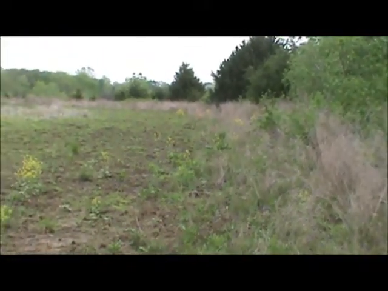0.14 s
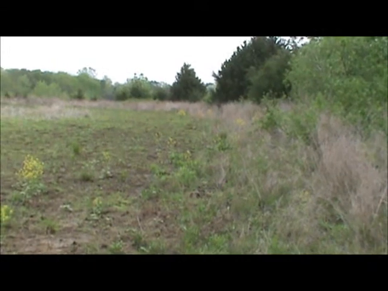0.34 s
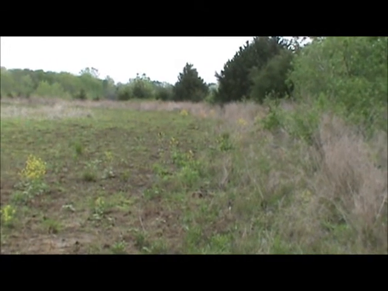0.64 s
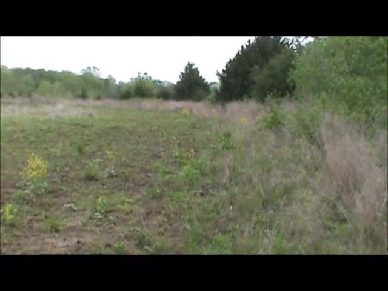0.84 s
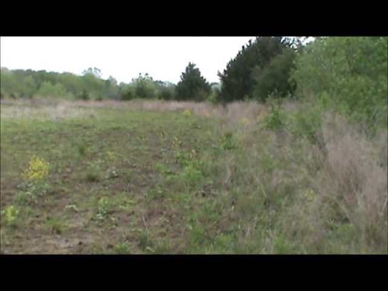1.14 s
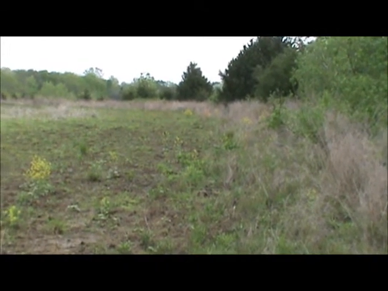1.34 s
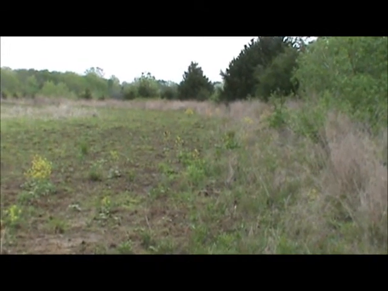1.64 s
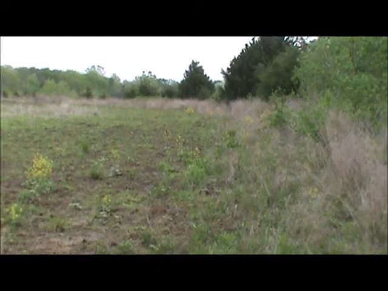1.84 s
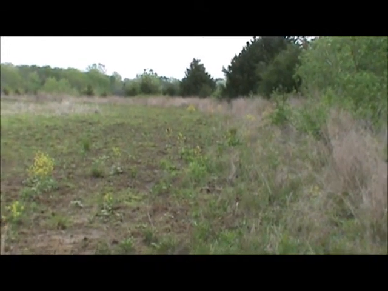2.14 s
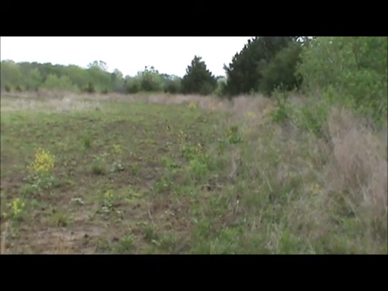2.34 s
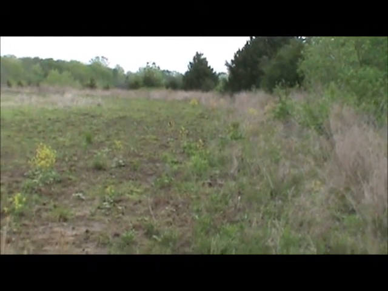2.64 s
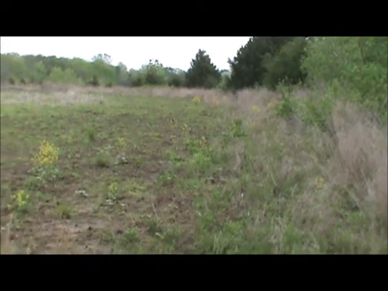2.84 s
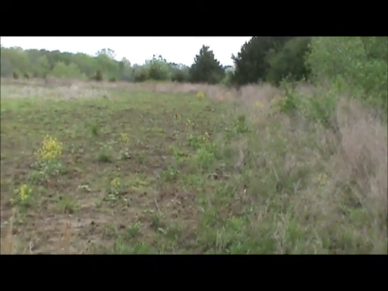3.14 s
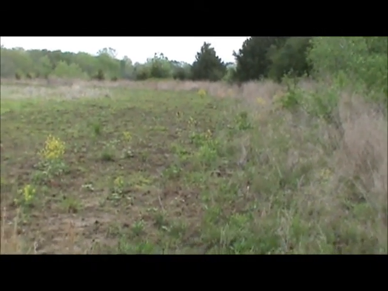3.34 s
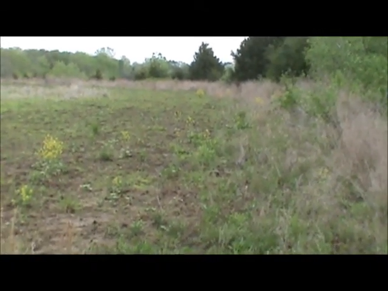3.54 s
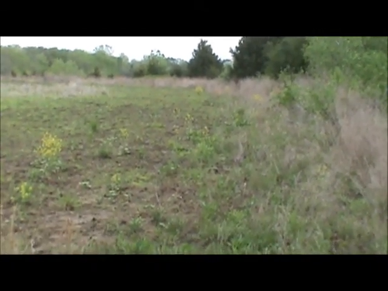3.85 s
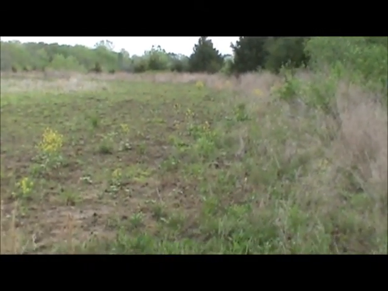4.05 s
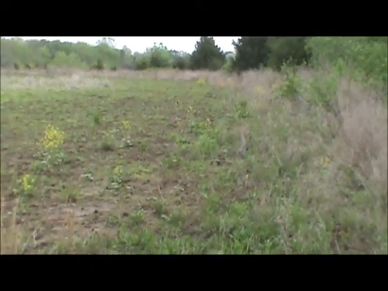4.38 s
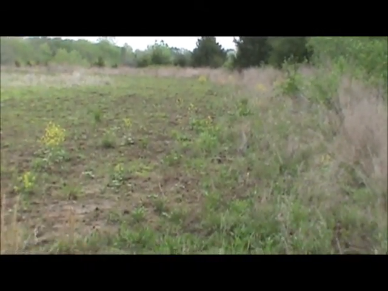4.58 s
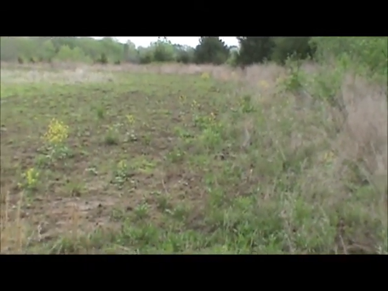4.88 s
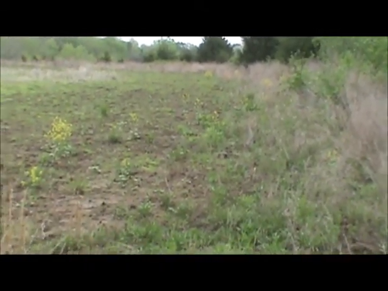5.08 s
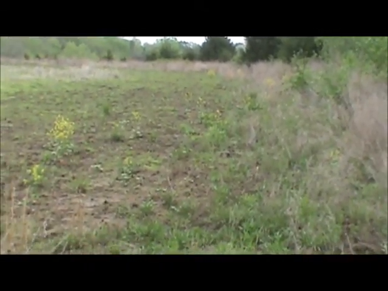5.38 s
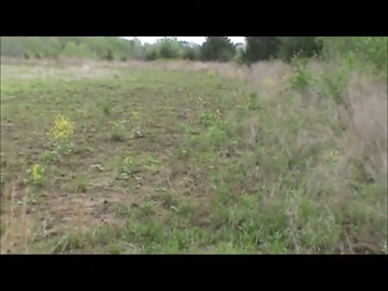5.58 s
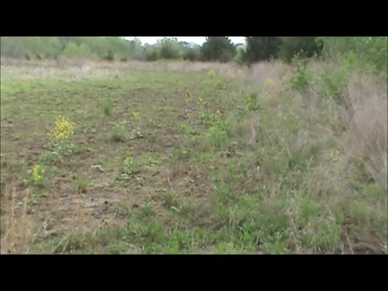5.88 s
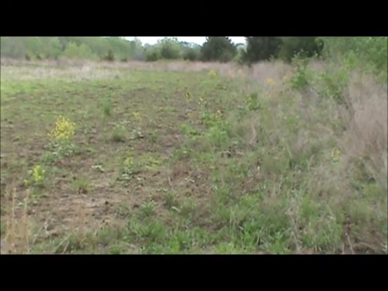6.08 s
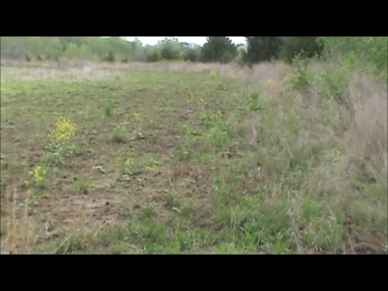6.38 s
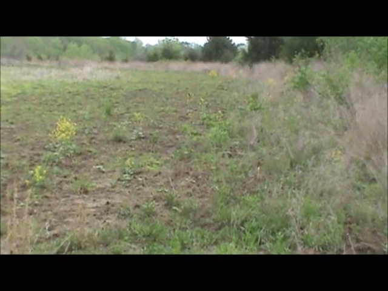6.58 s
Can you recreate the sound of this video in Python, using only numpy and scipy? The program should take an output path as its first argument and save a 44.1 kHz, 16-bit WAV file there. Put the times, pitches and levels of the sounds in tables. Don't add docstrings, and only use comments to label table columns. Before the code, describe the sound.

Squealing, raspy hound bays echo off a tree line under thumping wind and camera hiss, then a small bird whistles far off at left.

```python
import sys
import numpy as np
from scipy import signal
from scipy.fft import rfft, irfft, next_fast_len
from scipy.io import wavfile
from scipy.ndimage import uniform_filter1d, map_coordinates

SR = 44100
rng = np.random.default_rng(int(sys.argv[2]) if len(sys.argv) > 2 else 0)


def store_wav(level_fs):
    pcm = np.round(np.clip(np.atleast_2d(level_fs), -1, 1) * 32767)
    wavfile.write(sys.argv[1], SR, pcm.T.astype(np.int16))


def decibels_to_gain(level_db):
    exponent = np.asarray(level_db, float) / 20
    return 10 ** exponent


N = 296352
TIME = np.arange(N) / SR
CLOCK = np.arange(0, 7, .001)


def unit(x):
    return x / np.sqrt(np.mean(x ** 2) + 1e-20)


def along(points, hz):
    f, value = np.transpose(points)
    return np.interp(np.log(hz + 1), np.log(f + 1), value)


def curves(rows):
    s, *columns = np.transpose(rows)
    return [np.interp(TIME, s, column) for column in columns]


def played(tables, fade):
    inside = sum((TIME >= rows[0][0]) & (TIME < rows[-1][0]) for rows in tables) > 0
    gate = uniform_filter1d(inside * 1., int(fade * SR))
    return curves(sorted(row for rows in tables for row in rows)), gate


def wobble(rate):
    knots = rng.standard_normal(int(N * rate / SR) + 4)
    return map_coordinates(knots, [np.arange(N) * rate / SR])


def filtered(x, response):
    size = next_fast_len(N + SR // 2)
    return irfft(rfft(x, size) * response(np.fft.rfftfreq(size, 1 / SR)), size)[..., :N]


def paired(two, spectrum, alike):
    turn = lambda hz: np.arccos(np.clip(along(alike, hz), -1, 1)) / 2
    colour = lambda hz: decibels_to_gain(along(spectrum, hz)) * [np.cos(turn(hz)), np.sin(turn(hz))]
    mid, side = filtered(two, colour)
    return unit(np.array([mid + side, mid - side]))


def cycles(pitch_hz, jitter):
    return 2 * np.pi * np.cumsum(pitch_hz * (1 + jitter * wobble(70))) / SR


def slurs(rows, peak_at, rise_db, fall_db, bend):
    notes = []
    for s, long, a, b, db in rows:
        peak = (s + peak_at * long, a + bend * (b - a), db)
        notes.append([(s, a, db - rise_db), peak, (s + long, b, db - fall_db)])
    return notes


def swells(levels_db, floor_db):
    power = sum(decibels_to_gain(db) ** 2 for db in levels_db) + decibels_to_gain(floor_db) ** 2
    return [np.interp(TIME, CLOCK, np.sqrt(p)) for p in np.atleast_2d(power)]


def steady(x, seconds, share):
    level = np.abs(uniform_filter1d(np.mean(x ** 2, axis=0), int(seconds * SR))) + 1e-12
    return unit(x / level ** (share / 2))


# pitch_hz, density_db (per Hz)
HISS_COLOUR = [(12, -31), (20, 2), (53, 5), (134, -6), (215, -0.5), (318, -11.5), (695, -12.5),
               (800, -13.5), (1480, -17), (2450, -17.5), (3930, -21.5), (12700, -26), (15900, -25.5)]
# pitch_hz, likeness (0-1)
HISS_LIKENESS = [(60, 0.99), (130, 1), (290, 0.93), (640, 0.079), (1410, 0.022), (3100, 0.2), (6820, 0.54),
                 (15000, 0.82)]
# start_s, level_db
GAIN_RIDE = [(0, -49), (.9, -49), (1.4, -46.5), (2.4, -47.5), (2.92, -48), (2.935, -53), (4.05, -52.5),
             (4.5, -50), (6.72, -50.5)]
# start_s, level_db
RUMBLE_EASING = [(5.6, 0), (6.2, -1.5), (6.72, -5.5)]


def camera():
    scan_hz, frame_hz = 15734.3, 59.94
    gain_db, = curves(GAIN_RIDE)
    hiss = paired(rng.standard_normal((2, N)), HISS_COLOUR, HISS_LIKENESS)
    hiss = hiss * (1 + .04 * np.sin(2 * np.pi * frame_hz * TIME))
    hiss = filtered(hiss, lambda hz: 1 + 0.33 * np.exp(-((hz - 9150) / 350) ** 2))
    rumble = filtered(hiss, lambda hz: 1 / (1 + (hz / 350) ** 4))
    hiss = hiss + (decibels_to_gain(1.9 * wobble(6.4)) - 1) * rumble
    deepest = filtered(hiss, lambda hz: 1 / (1 + (hz / 110) ** 4))
    hiss = hiss + (decibels_to_gain(curves(RUMBLE_EASING)[0]) - 1) * deepest
    throb = 1 + .45 * np.sin(2 * np.pi * 10.5 * TIME)
    whine = decibels_to_gain(-11 + 1.5 * wobble(12)) * np.sin(2 * np.pi * scan_hz * TIME) * throb
    return decibels_to_gain(gain_db) * (decibels_to_gain(9.5) * hiss + whine)


# start_s, length_s, level_db, brightness_db
GUST_EVENTS = [(0.155, 0.19, -38.5, -21), (0.447, 0.31, -37.5, -13), (0.829, 0.28, -18, 0.5),
               (1.11, 0.13, -24.5, 4), (1.31, 0.045, -18, -2.5), (1.46, 0.093, -27.5, -16),
               (1.58, 0.069, -19, -8), (1.654, 0.025, -26.5, 12.5), (1.762, 0.12, -18.5, -5),
               (1.977, 0.043, -18, -5), (2.077, 0.054, -24.5, -0.5), (2.179, 0.088, -16.5, -4.5),
               (2.386, 0.13, -18, -10), (2.574, 0.25, -22.5, -3.5), (2.896, 0.14, -24.5, 1.5),
               (3.164, 0.05, -26.5, -3.5), (3.263, 0.17, -20.5, -1.5), (3.5, 0.046, -30, -3.5),
               (3.614, 0.036, -35, -23), (3.803, 0.018, -35, -14), (3.956, 0.042, -26.5, -12.5),
               (4.091, 0.21, -22.5, -9), (4.319, 0.1, -35, -8), (4.498, .16, -43, -14),
               (4.744, 0.13, -39, -23), (4.955, 0.079, -42, -24), (5.467, 0.045, -29, -21),
               (5.632, 0.2, -42.5, -9), (6.297, 0.1, -57, 10)]


def gusts():
    rise_s, fall_s, lull_db = 0.044, 0.07, -57.5
    levels_db = []
    for s, long, db, bright_db in GUST_EVENTS:
        outside = np.maximum((s - CLOCK) / rise_s, (CLOCK - s - long) / fall_s)
        levels_db.append(db - 20 * np.maximum(outside, 0) + np.array([[0], [bright_db]]))
    return swells(levels_db, lull_db)


# pitch_hz, density_db (per Hz)
BUFFET_COLOUR = [(12, -62), (20, -4.5), (81, -0.5), (158, -1), (240, -6.5), (282, -11.5), (700, -32),
                 (910, -37), (1540, -120)]
# pitch_hz, share (0-1)
EDDY_SHARE = [(30, .91), (100, .76), (300, .55), (900, .5)]


def wind():
    dull, bright = gusts()
    struck = rng.random((3, N)) < 150 / SR
    hits = struck * rng.choice([-1, 1], (3, N)) * decibels_to_gain(rng.normal(0, 2.27, (3, N)))
    eddies = hits + 0.029 * rng.standard_normal((3, N))
    share = lambda hz: np.clip(along(EDDY_SHARE, hz), 0, 1)
    sweep = lambda hz: np.sqrt(share(hz)) * np.exp(1j * np.pi * hz * 0.00096 * np.array([[1], [-1]]))
    pushes = filtered(eddies[0], sweep) + filtered(eddies[1:], lambda hz: np.sqrt(1 - share(hz)))
    buffet = filtered(pushes, lambda hz: decibels_to_gain(along(BUFFET_COLOUR, hz)))
    low = filtered(buffet, lambda hz: 1 / (1 + (hz / 130) ** 4))
    return dull * steady(low, seconds=.07, share=.6) + bright * steady(buffet - low, seconds=.05, share=.45)


# pitch_hz, level_db
UPPER_HARMONICS = [(2900, -7), (3150, -10), (3450, -34), (4050, -30), (4180, -13), (4350, -16), (4600, -33),
                   (5600, -29)]
# start_s, length_s, from_hz, to_hz, level_db
LEAD_INS = [
    (.591, 0.058, 1190, 1370, -21.5),
    (2.41, 0.072, 1240, 1435, -19.5),
    (2.946, 0.017, 1000, 990, -34.5),
    (4.097, .026, 831, 858, -29),
    (4.574, 0.019, 1010, 995, -24.5),
]
# length_share, climb_share, level_db
LEAD_SHAPE = [(0, 0, -18), (.3, .9, -6), (.7, 1, 0), (1, .9, -7)]
# start_s,
# length_s, from_hz, to_hz, level_db
CATCHES = [(.648, 0.027, 1330, 1320, -27), (1.288, 0.05, 1074, 1141, -19.5),
           (1.318, 0.052, 1103, 1334, -19), (1.342, .022, 2300, 2440, -26.5),
           (1.358, 0.027, 2440, 2640, -34), (1.615, 0.031, 1566, 1470, -14.5),
           (1.648, 0.023, 1335, 1372, -13.5), (1.81, 0.026, 1886, 1899, -26),
           (1.815, 0.057, 1472, 1400, -28.5), (1.85, .022, 2034, 2050, -32), (1.928, 0.03, 1422, 1490, -32),
           (1.97, 0.032, 1360, 1238, -30), (2.468, 0.02, 1300, 1163, -18.5),
           (2.59, 0.027, 1893, 1860, -23.5), (2.6, 0.04, 1407, 1223, -28.5), (3.0, 0.038, 3080, 3027, -47),
           (4.185, .04, 2960, 2900, -37.5), (4.68, 0.066, 2560, 2480, -30.5),
           (4.735, .035, 2700, 2770, -39)]


def squeal():
    leads = []
    for s, long, a, b, db in LEAD_INS:
        leads.append([(s + at * long, a + climb * (b - a), db + edge_db) for at, climb, edge_db in LEAD_SHAPE])
    voices = [(leads, -12)]
    for k in range(3):
        voices.append((slurs(CATCHES[k::3], peak_at=0.572, rise_db=16, fall_db=9.5, bend=.55), -26))
    out = np.zeros(N)
    for notes, overtone_db in voices:
        (pitch, first_db), gate = played(notes, fade=0.00072)
        phase = cycles(pitch, jitter=.006) + .45 * wobble(180)
        third = decibels_to_gain(1.0 + along(UPPER_HARMONICS, 3 * pitch)) * np.sin(3 * phase)
        tone = np.sin(phase) + decibels_to_gain(overtone_db) * (np.sin(2 * phase) + third)
        out += np.sqrt(2) * gate * decibels_to_gain(first_db + 0.92 * wobble(90)) * tone
    return out


# start_s (centre), level_db, half_length_s
CRACKS = [(0.641, -28, 0.021), (0.84, -38, 0.043), (1.007, -44, 0.036), (1.106, -40, .02),
          (1.236, -32, 0.025), (1.285, -31, .03), (1.33, -25, 0.04), (1.665, -25, 0.027),
          (1.841, -28, 0.029), (1.98, -29, 0.019), (2.472, -22.5, 0.02), (2.548, -42, 0.022),
          (2.613, -38, 0.026), (2.982, -29, 0.036), (3.164, -43, 0.024), (4.114, -37, 0.029),
          (4.348, -31, 0.0099), (4.756, -32, .01), (4.175, -30, 0.016), (4.245, -32, 0.031),
          (4.338, -28, 0.021), (4.591, -27.5, 0.011), (4.655, -27, .022), (4.685, -26.5, .02),
          (4.713, -26, 0.024), (4.745, -27, 0.022)]


def rasp_level():
    edge_loss_db, breath_db = 6, -49
    cracks_db = [db - edge_loss_db * ((CLOCK - s) / half) ** 2 for s, db, half in CRACKS]
    return 20 * np.log10(swells(cracks_db, breath_db)[0])


# start_s, pitch_hz, level_db,
# sum_tones_db (over it)
ROUGH_STRANDS = [
    [(1.225, 1016, -46, -8), (1.25, 1074, -42, -4), (1.29, 1087, -36, -3), (1.315, 1126, -35, -5),
     (1.34, 1180, -36, 1)],
    [(1.69, 1330, -36, -10), (1.73, 1510, -47, -8), (1.775, 1390, -45, -12)],
    [(2.975, 1258, -42, 1), (3.0, 1202, -44, -3), (3.025, 1128, -51, -10)],
    [(4.165, 983, -38, -14), (4.185, 1098, -37, -14), (4.215, 1095, -45, -7), (4.25, 1130, -43, -2)],
    [(4.325, 1120, -35, -11), (4.34, 1168, -25, -17), (4.348, 1251, -38, -12), (4.365, 1447, -35, -16)],
    [(4.638, 1325, -32, -8), (4.66, 1234, -31, -5), (4.685, 1130, -30, 1), (4.705, 1160, -28, -3),
     (4.725, 1120, -31, -4), (4.74, 1273, -27.5, -4), (4.765, 1130, -38, -10)],
]


def strands(phase):
    (pitch, level_db, sums_db), gate = played(ROUGH_STRANDS, fade=0.0027)
    own = cycles(pitch, jitter=.02) + 1.1 * wobble(170)
    tones_db = [level_db, level_db + sums_db, level_db + sums_db - 5.5]
    tones = sum(decibels_to_gain(db + 2.6 * wobble(80)) * np.sin(own + k * phase) for k, db in enumerate(tones_db))
    return np.sqrt(2) * gate * tones


# start_s, pitch_hz, effort_db, jaw_opening (0-1), pressing_db (of the folds)
LONG_BAYS = [
    [(.643, 836.5, -25, 0.09, 4.5), (.79, 880, -26.5, 0.95, -5.5), (.93, 935.5, -26, 0.5, 3),
     (1.02, 923.6, -25, 0.78, -7.5), (1.085, 888, -25, 0.6, -4), (1.205, 902, -23.5, 0.68, -6),
     (1.23, 823, -20.5, 0.36, -12), (1.27, 826, -16, 0.3, -14.5), (1.33, 800, -26, 0.2, -10)],
    [(1.647, 754, -22.5, 0.21, -1), (1.68, 885, -22.5, 0.85, -3), (1.72, 939.6, -23.5, 0.44, 4),
     (1.765, 938, -27, 0.44, 5), (1.79, 933, -27, 0.8, -7), (1.81, 945, -27, 0.55, -1),
     (1.82, 900.6, -43, 0.64, 4), (1.843, 927, -37, 0.7, 0)],
    [(1.845, 1000, -25.5, 0.8, -16), (1.875, 952, -26.5, 0.6, -6.5), (1.905, 920, -29.5, 0.45, -1),
     (1.94, 954, -28, 0.42, 6.5), (1.975, 907, -33.5, 0.38, 2)],
]
# start_s, pitch_hz, effort_db, jaw_opening (0-1), pressing_db
SHORT_BAYS = [
    [(2.457, 792, -15, 0.5, -22), (2.5, 772, -11.5, 0.44, -17), (2.507, 856, -18.5, 0.7, -17),
     (2.525, 870, -21, 0.59, -7), (2.555, 892, -29.5, 0.79, -1), (2.575, 926, -29.5, .5, 0.5),
     (2.59, 946, -30, 0.46, 6)],
    [(2.96, 796, -37, 0.44, 0), (2.976, 780, -29, .4, 2), (2.995, 749, -25, 0.26, -0.5),
     (3.015, 797, -25, 0.5, -20), (3.04, 836, -33, 0.85, 0.5), (3.075, 884, -30.5, 0.66, -4),
     (3.115, 921, -28.5, 0.86, -2), (3.142, 920, -32.5, 0.83, 2.5), (3.155, 832, -33.5, 0.48, -7),
     (3.17, 620, -34, 0.52, -25)],
]
# start_s, pitch_hz, effort_db, jaw_opening (0-1), pressing_db
SECOND_HOUND = [
    [(4.113, 686.5, -40, 0.41, -4), (4.13, 748, -31, 0.51, -7), (4.165, 718, -24, 0.63, -8),
     (4.178, 707, -24.5, 0.74, -14), (4.2, 729, -25, 0.26, -2), (4.243, 737, -23, 0.4, -9.5)],
    [(4.245, 772, -20, 0.55, -8), (4.258, 833, -23.5, 0.7, -8), (4.275, 835, -24, .56, 0),
     (4.29, 830, -28, 0.56, 5), (4.306, 789, -21, 0.78, -7.5), (4.322, 789, -23, 0.57, -7),
     (4.333, 779, -32.5, 0.58, -3), (4.352, 714, -36, 0.3, -6)],
    [(4.588, 755, -38, 0.53, -2), (4.6, 803, -25.5, 0.55, 1.5), (4.612, 788, -24, 0.7, 8.5),
     (4.628, 761, -23, 0.67, -7.5), (4.645, 746, -18, 0.69, -7), (4.66, 767.4, -22, 0.26, -14),
     (4.72, 749, -21, 0.26, -24), (4.732, 741, -31, 0.39, -10), (4.765, 690, -36, 0.34, -10)],
]
MOUTH_LIFT = [0, -4]
# pitch_hz, width_hz, level_db
THROAT_RINGS = [(1120, 720, 0), (1435, 81, 8.5), (1490, 170, 2), (1990, 170, 2.5), (2143, 120, 3.5),
                (2584, 190, 1), (2900, 140, -2.5), (4620, 570, -11)]
# start_s, level_db
MOUTH_COLOUR = [(.6, 1.5), (1.3, -5), (1.68, 3), (1.85, 0.5), (2, -10), (2.47, -9), (3, -2.5), (3.2, -3),
                (4.2, 4), (4.7, 7.5)]


def bay():
    calls = LONG_BAYS + SHORT_BAYS + SECOND_HOUND
    (pitch, effort_db, opening, press_db), gate = played(calls, fade=0.0038)
    rasp_db = rasp_level()
    rasp_spans = [[(call[0][0] - .008, 0), (call[-1][0] + 0.014, 0)] for call in calls]
    rasp_gate = played(rasp_spans, fade=0.0061)[1]

    mouth_hz, mouth_width_hz = 823 + 1930 * opening, 537
    off = lambda k: (k * pitch - mouth_hz) / mouth_width_hz
    lift = lambda k: press_db + MOUTH_LIFT[k - 2] - 20 * np.log10(1 + off(k) ** 2)
    levels_db = [effort_db, effort_db + lift(2), effort_db + lift(3)]
    levels_db += [levels_db[2] + along(UPPER_HARMONICS, k * pitch) for k in range(4, 8)]

    phase = cycles(pitch, jitter=0.004106)
    hoarse = np.clip(1.3 * decibels_to_gain(rasp_db - levels_db[0]), 0, 1)
    shaken = phase + .45 * hoarse * wobble(220)
    flutter = lambda: 1.9 * wobble(45) + 3.5 * hoarse * wobble(90)
    clear = np.zeros(N)
    for k, db in enumerate(levels_db):
        clear += decibels_to_gain(db + (1 + .2 * k) * flutter()) * np.sin((k + 1) * shaken)

    beat = np.exp(4.5 * np.cos(phase)) * np.cos(phase / 3 + 2.2 * wobble(60))
    breath = (1 + 0.36 * np.cos(phase)) * rng.standard_normal(N)
    ring = lambda f, c, w: 1j * f * w / (c * c - f * f + 1j * f * w)
    throat = lambda f: sum((-1) ** k * decibels_to_gain(db) * ring(f, c, w) for k, (c, w, db) in enumerate(THROAT_RINGS))

    def steep(f):
        response = throat(f)
        return response * np.abs(response) ** .5

    rasp = unit(unit(filtered(beat, steep)) + 1.3 * unit(filtered(breath, steep)))
    upper = filtered(rasp, lambda f: 1 / (1 + (1750 / (f + 1)) ** 8))
    rasp = rasp + (decibels_to_gain(curves(MOUTH_COLOUR)[0]) - 1) * upper
    rasp = rasp_gate * decibels_to_gain(rasp_db - 7.0 + 0.4 * flutter()) * rasp
    return gate * np.sqrt(2) * clear + rasp + strands(shaken)


# delay_s, level_db
TREE_ECHOES = [
    (.048, -26),
    (.081, -19),
    (.12, -18),
]
# pitch_hz, level_db
LEAF_COLOUR = [(500, -4), (850, -9), (1250, -4), (1650, -5), (1850, 0), (2400, -5), (2800, -10), (5000, -6)]
# pitch_hz, t60_s
FIELD_DECAY = [(500, 0.25), (900, 0.62), (1800, 0.54), (3000, 0.72), (6000, 0.59)]
# pitch_hz, level_db
FAR_WOOD = [(400, -41), (700, -40), (900, -56), (1200, -49), (3000, -99)]


def field(x):
    spread = np.array([[-.00006], [.00006]])

    def near(f):
        delayed = lambda k, s: np.exp(-2j * np.pi * f * (s + (-1) ** k * spread))
        return decibels_to_gain(along(LEAF_COLOUR, f)) * sum(decibels_to_gain(db) * delayed(k, s) for k, (s, db) in enumerate(TREE_ECHOES))

    hz, t, z = signal.stft(rng.standard_normal((2, int(1.5 * SR))), SR, nperseg=256)
    scatter = decibels_to_gain(-12.5 + along(LEAF_COLOUR, hz)[:, None] - 60 * t / along(FIELD_DECAY, hz)[:, None])
    far = decibels_to_gain(along(FAR_WOOD, hz)[:, None] - 60 * t / 5.8)
    onset = np.clip(t / 0.0069, 0, 1)
    tail = signal.istft(z * (scatter + far) * onset, SR, nperseg=256)[1]
    tail = np.array([tail[0] + 0.26 * tail[1], tail[0] - 0.41 * tail[1]])
    stirred = decibels_to_gain(3.5 * wobble(30))
    scattered = signal.fftconvolve(x[None], tail, axes=1)[:, :N]
    return filtered(x, near) * decibels_to_gain([[-1.5], [1.5]]) + decibels_to_gain(-25.5) * stirred * scattered


# start_s, peak_db, pitch_hz, edge_db
WIND_SLAPS = [(0.821, -7.5, 144, -34), (.978, -17, 203, -45), (1.009, -11, 112, -32), (1.041, -5, 142, -37),
              (1.1, -22, 173, -28), (1.331, -8, 83, -40), (1.355, -17, 111, -28), (1.648, -11.5, 170, -52),
              (1.83, -16, 156.4, -48), (2.976, -22, 90, -50), (3.328, -12, 119.4, -46),
              (4.12, -23, 109.8, -55), (4.171, -18, 176, -51), (4.232, -19, 150.6, -53),
              (4.309, -25, 229, -50), (4.376, -24.5, 210.2, -47), (1.596, -9.5, 113, -56),
              (1.673, -11.5, 170, -50), (1.986, -9, 105, -52), (2.166, -11, 107, -49),
              (2.205, -6.5, 102, -52), (2.251, -18, 156, -59), (2.483, -10, 87.5, -27),
              (2.67, -23.5, 149, -27), (2.932, -8.5, 132, -28.5), (3.287, -31, 162, -35),
              (3.308, -28.5, 156, -16), (3.471, -12.5, 103.1, -57), (4.811, -21.5, 74.33, -52),
              (5.46, -18.5, 83, -61), (5.735, -21, 64, -44), (.835, -8.5, 165, -41), (.888, -6.5, 94, -47),
              (0.911, -11, 62.3, -50), (.931, -13, 130, -48), (.958, -10, 109, -35), (1.063, -11, 109, -47),
              (1.117, -12.5, 149, -40), (2.191, -8, 99, -55), (2.372, -17, 105, -57),
              (2.455, -10, 109.7, -50), (2.627, -12, 90.2, -49), (4.402, -30, 50, -56),
              (4.958, -30, 50.03, -58)]


def slaps():
    out, t = np.zeros((2, N + SR)), np.arange(SR // 20) / SR
    pans_db = rng.normal(-1.5, 3, len(WIND_SLAPS))
    for (s, db, hz, edge_db), pan_db in zip(WIND_SLAPS, pans_db):
        from_edge = t - .5 / hz
        u = from_edge * hz
        swing = -np.tanh(8.2 * u) * np.exp(-(u / 0.32) ** 2) * np.cos(0.81 * u)
        edge = -np.tanh(from_edge / .0003) * np.exp(-(from_edge / .0011) ** 2)
        level = decibels_to_gain(db + 1.5 + np.array([[.5], [-.5]]) * pan_db)
        out[:, round(s * SR):][:, :len(t)] += level * (swing + decibels_to_gain(edge_db + 24.5) * edge)
    return out[:, :N]


# start_s, click_db, knock_db
BODY_TICKS = [
    (1.8228, -34, -60),
    (4.1579, -39, -60),
    (5.53, -44, -60),
    (4.4085, -38, -38),
    (4.4947, -35, -26),
    (4.503, -31, -15),
    (6.041, -39, -49),
]
# pitch_hz, level_db, t60_s
CASING_RINGS = [(206.4, -2.5, 0.089), (582, 9.5, 0.015), (1016, 4.5, 0.031), (1990, -10, 0.042)]


def casing():
    out, t = np.zeros(N + SR), np.arange(SR // 12) / SR
    for s, click_db, knock_db in BODY_TICKS:
        knock = sum(decibels_to_gain(db - 60 * t / t60) * np.sin(2 * np.pi * hz * t) for hz, db, t60 in CASING_RINGS)
        knock = knock * (1 - np.exp(-t / 0.00056))
        click = decibels_to_gain(-60 * t / 0.051) * uniform_filter1d(rng.standard_normal(len(t)), size=3)
        out[round(s * SR):][:len(t)] += decibels_to_gain(knock_db) * knock + decibels_to_gain(click_db) * click
    return out[:N]


# start_s, level_db
FAR_BAY = [
    (3.45, -66),
    (3.658, -51),
    (4.032, -54.5),
    (4.07, -42),
]
# pitch_hz, density_db (per Hz)
FAR_VOICE = [(450, -20), (560, -4), (680, 1), (870, 3), (1000, -4), (1500, -39)]


def far_hound():
    (level_db,), gate = played([FAR_BAY], fade=0.068)
    band = paired(rng.standard_normal((2, N)), FAR_VOICE, [(800, 0.85)])
    return gate * decibels_to_gain(level_db + 3.1 * wobble(24.6)) * band


# start_s, level_db, top_hz, scoop_share (up), drop_share (at the end)
PHRASES = [
    (5.672, -53, 2446, 0.052, 0.055),
    (5.916, -49.5, 2436, .06, 0.038),
    (6.18, -50, 2400, 0.0392, 0.0045),
    (6.478, -52, 2390, 0.0056, 0.068),
]
# delay_s, scoop_share, drop_share, level_db
ARCH = [(0, 1, 0, -7), (.018, .4, 0, -2), (.045, 0, 0, 0), (.085, 0, .1, -1.5), (.112, 0, 1, -10)]
# start_s, length_s, from_hz, to_hz, level_db
CHIRPS = [
    (5.79, .07, 2520, 2670, -58),
    (6.056, .038, 2520, 2620, -54.5),
    (6.322, 0.037, 2520, 2570, -56),
    (6.59, .036, 2480, 2520, -55),
]


def bird():
    arches = []
    for s, db, hz, scoop, drop in PHRASES:
        arches.append([(s + at, hz * (1 - up * scoop - down * drop), db + edge_db) for at, up, down, edge_db in ARCH])
    chirps = slurs(CHIRPS, peak_at=.5, rise_db=4, fall_db=4, bend=.6)
    (pitch, level_db), gate = played(arches + chirps, fade=0.008)
    smooth = uniform_filter1d(pitch, int(0.012 * SR))
    whistle = gate * decibels_to_gain(level_db + 4.5 + 0.8 * wobble(36)) * np.sin(cycles(smooth, jitter=0.00184))
    return whistle * decibels_to_gain([[2.5], [-3.5]])


def scene():
    dogs = bay() + squeal()
    second = dogs * (TIME > 3.7)
    treble = filtered(second, lambda hz: 1 / (1 + (1450 / (hz + 1)) ** 6))
    answers = field(dogs + (decibels_to_gain(-8) - 1) * treble)
    air = filtered(wind() + slaps(), lambda hz: hz ** 2 / (hz ** 2 + 31 ** 2))
    return dogs * decibels_to_gain([[-1.7], [1.4]]) + answers + far_hound() + bird() + air + casing() + camera()


def low_pass(x):
    return signal.sosfilt(signal.butter(12, 15960, fs=SR, output="sos"), x)


def record(dry):
    x = dry / (1 + np.abs(dry / 0.99) ** 12) ** (1 / 12)
    top_hz, fall_db_per_hz = 15760, .15
    mix = filtered(x, lambda hz: decibels_to_gain(-fall_db_per_hz * np.clip(hz - top_hz, 0, None)))
    return low_pass(mix)


dry = scene()
out = record(dry)
store_wav(out)
```